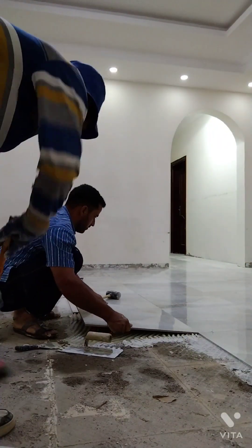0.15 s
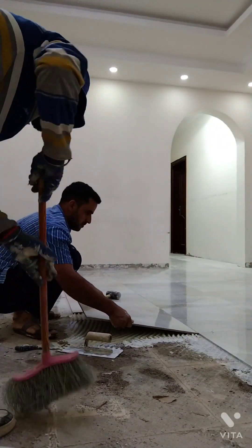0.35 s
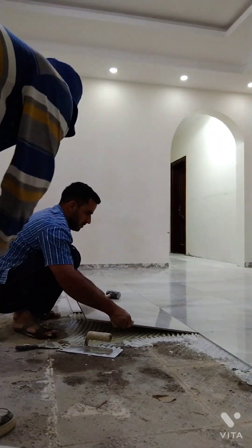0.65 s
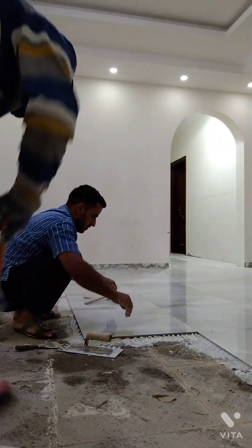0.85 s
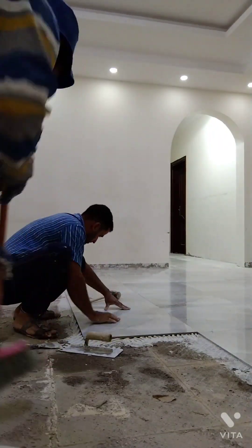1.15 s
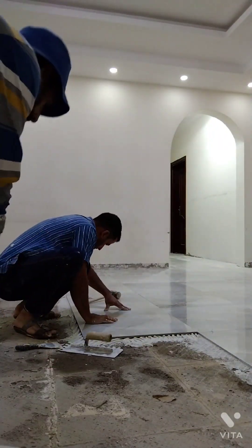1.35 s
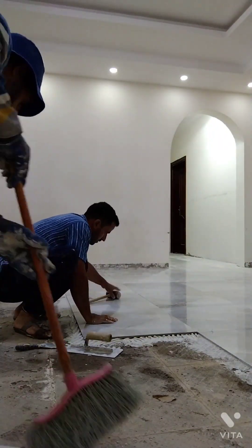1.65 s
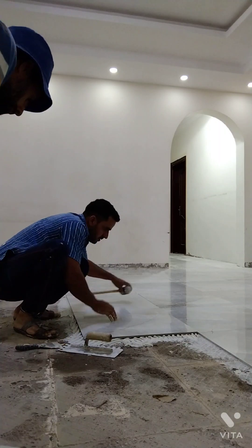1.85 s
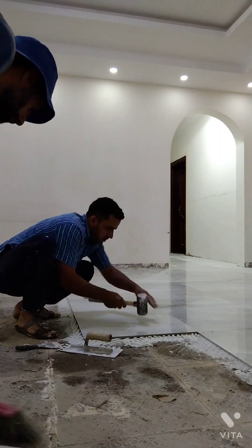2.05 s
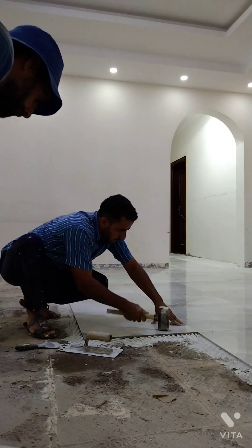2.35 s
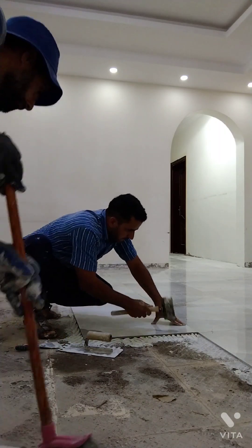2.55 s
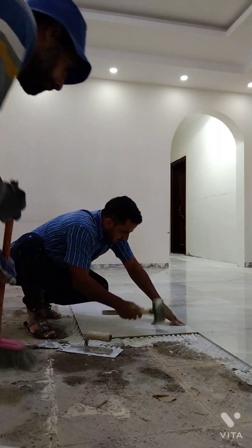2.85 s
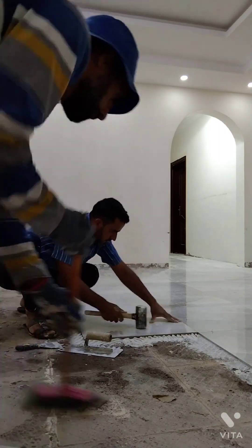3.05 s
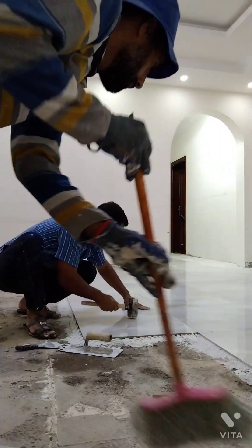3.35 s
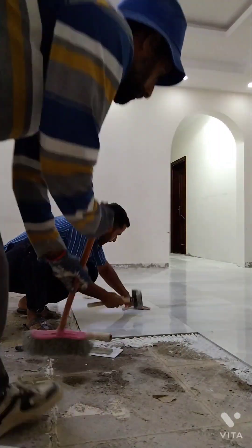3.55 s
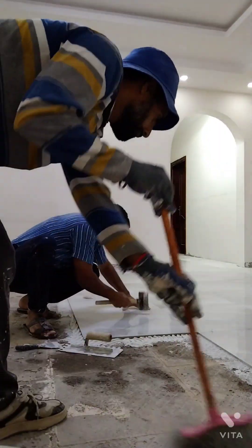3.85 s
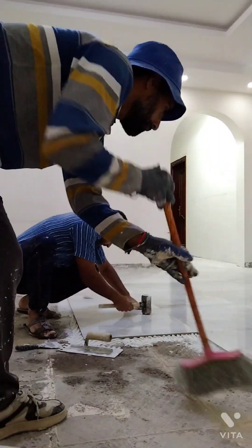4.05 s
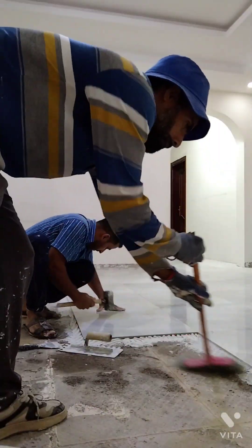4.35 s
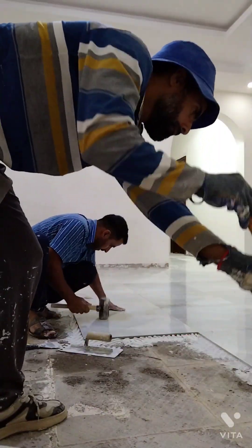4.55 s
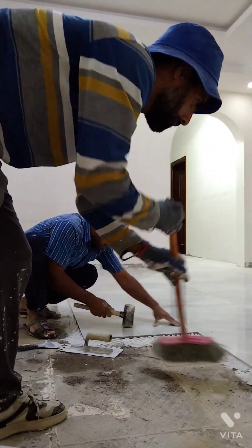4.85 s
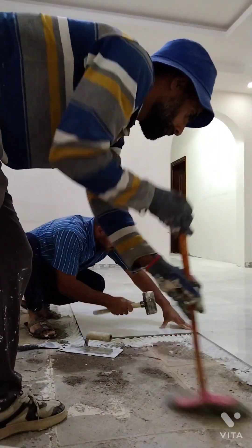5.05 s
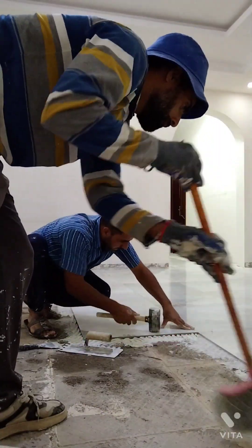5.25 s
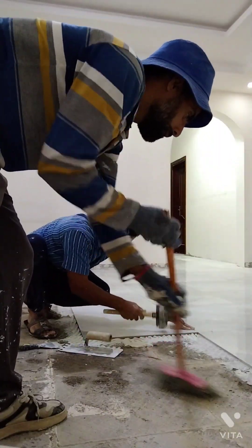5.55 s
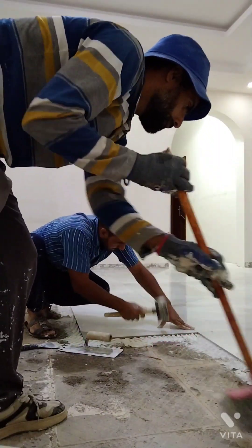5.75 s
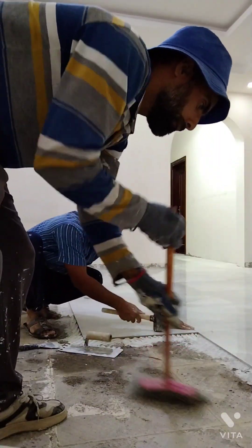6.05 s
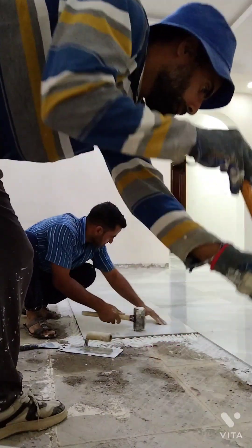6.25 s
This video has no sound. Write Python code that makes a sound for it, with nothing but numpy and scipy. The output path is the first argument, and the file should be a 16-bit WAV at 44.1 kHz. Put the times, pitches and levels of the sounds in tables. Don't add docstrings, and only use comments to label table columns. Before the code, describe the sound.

Inside a large empty hall with hard walls, a tile lands softly in adhesive and steel clangs in another room. Then brisk mallet knocks come in groups of five, five, two and a longer last run, each boomy and reverberant. Thin broom strokes brush grit close by, far quieter than the blows, with low slab rumble beneath and a small microphone's restrained noise floor.

```python
import sys
import numpy as np
from scipy import signal
from scipy.fft import rfft, irfft
from scipy.io import wavfile
from scipy.ndimage import uniform_filter1d

SR = 44100
rng = np.random.default_rng(int(sys.argv[2]) if len(sys.argv) > 2 else 0)


def put_to_file(sound):
    columns = np.atleast_2d(sound).T
    safe = np.clip(columns, -1, 1)
    whole_steps = np.round(safe * 32767)
    wavfile.write(sys.argv[1], SR, whole_steps.astype(np.int16))


def elevation(decibels):
    levels = np.asarray(decibels, float)
    return 10 ** (levels / 20)


N = 282460
EARLY = round(.3 * SR)

# [t/s, blow level/dB, direct level re blow/dB, crack level/dB]
MALLET_TAPS = [
    [(1.7795, -11.5, 9.5, 6.5), (1.9230, -13.5, 7, 7), (2.0510, -11.5, -21, 6), (2.1870, -12.5, 1, 5.5),
     (2.3165, -15.5, -5, -1.5)],
    [(2.9334, -13, 14, 3), (3.0792, -10.5, 10.5, 6.5), (3.2144, -10.5, 10.5, 8), (3.3548, -11.5, -19, 7),
     (3.5036, -12, 12.5, 8)],
    [(3.8650, -13.5, -23, 2), (3.9950, -16, -23, 6)],
    [(4.5330, -11, -18, 4.5), (4.6731, -12.5, -19, -1.5), (4.8188, -12, -4, -1), (4.9401, -12, 3, 3),
     (5.0794, -11.5, 12, 4), (5.2107, -15, -1, 5.5), (5.3411, -12.5, 7.5, -6), (5.3605, -23, -8, 9.5)],
]
# [delay/s, level/dB, crack level/dB]
WALL_ECHOES = [
    [(.0030, 0, -15), (.0095, -17, -14), (.0130, -3.5, 8), (.0250, -15, -18), (.0310, -14, 14)],
    [(.0097, 1, 4), (.0153, 0, -10), (.0290, -12, -10), (.0430, -23, 5), (.0950, 3, -28), (.1040, -19, -16)],
    [(.0053, -16, -12), (.0097, 3, 3), (.0190, -10, -11), (.0240, -3, -3), (.0440, 4, -8)],
    [(.0101, 6.5, 2.5), (.0158, 2.5, -12), (.0300, 4, -24), (.0350, -1, -3), (.0420, -5, 5)],
]
# [f/Hz, density level/dB per Hz]
TILE_SPOT_1 = [(82, -59), (140, -22.5), (524, -6.5), (578, -9.5), (638, -8), (874, -9), (1110, -9.5),
               (1640, -16), (1850, -21), (6780, -40.5), (8580, -46), (15500, -48.5)]
TILE_SPOT_2 = [(82, -41), (140, -33), (216, -17.5), (321, -0.5), (439, -5.5), (535, -3.5), (1010, -10),
               (1150, -7.5), (1850, -19.5), (3160, -30), (4160, -36), (6810, -44), (9160, -50.5),
               (15600, -36.5)]
TILE_SPOT_3 = [(82, -60), (140, -20), (181, -19), (284, -4), (382, -0.5), (578, -4.5), (1020, -13.5),
               (1640, -15), (1810, -22.5), (3020, -27), (8090, -48), (15500, -50)]
TILE_SPOT_4 = [(82, -50), (140, -9.5), (268, -8.5), (302, -3), (375, -2), (504, -3), (777, -2),
               (1350, -4.5), (1810, -14), (6650, -32.5), (10200, -40.5), (15500, -32)]
# [t/s, peak level/dB, f/Hz, T60/s, hall level/dB, slap level/dB]
SOFT_THUDS = [
    (.203, -8.5, 106, 0.025, -38, -26),
    (5.218, -7.5, 148, 0.034, -55, -49),
    (0.23, -38, 230, 0.026, -61, -25),
    (4.423, -24, 550, 0.047, -51, -40),
]
# [f/Hz, density level/dB per Hz]
ADHESIVE_SLAP = [(120, -61), (200, 2.5), (333, 0.5), (585, -6), (890, -12.5), (2020, -15.5), (6240, -30),
                 (9830, -36), (15500, -28)]
# [t/s, crash level/dB, length/s, swell/s]
STEEL_RATTLES = [
    (-.08, -43, 0.15, 0.03),
    (0.646, -60, 0.023, 0.005),
    (1.051, -40, 0.13, 0.0054),
    (2.736, -35, 0.063, 0.072),
    (2.813, -42, 0.028, 0.022),
]
# [f/Hz, density level/dB per Hz]
CRASH_SPECTRUM = [(300, -25.5), (1030, -9.5), (1880, -8.5), (3300, -12), (4500, -19), (6350, -26.5),
                  (8200, -39), (15500, -43.5)]
# [f/Hz, level/dB]
STEEL_MODES = [
    [(1430, -7), (2200, 0), (2340, -9), (3470, -10), (4410, 1), (5050, -16), (5730, -10), (6270, -14),
     (6890, -11), (8000, -24), (10100, -28)],
    [(4770, -10), (6490, -1), (9970, -2), (14000, -10), (14780, -11)],
    [(641, 0), (947, -3), (1310, -6)],
    [(1244, -5), (1427, -6), (1674, -10), (1846, 0), (2013, -7), (2202, -9), (2654, -6), (2778, -8),
     (3004, -3), (3100, -6), (3840, -14), (5889, -11), (9249, -19), (12760, -20)],
    [(9020, 0), (10600, -8)],
    [(1755, -6), (2180, -4), (3025, 0), (3505, -8), (4204, -16), (5000, -19), (5792, -13), (6220, -18),
     (6632, -11)],
    [(1222, 0), (1640, -8), (2665, -5), (9200, -34)],
    [(3555, -6), (4200, 0), (4980, -7), (6289, -8), (7900, -15), (10700, -19)],
]
# [t/s, ring level/dB, swell/s]
STEEL_STRIKES = [
    [(-.08, -34, .028)],
    [(.6, -47, .09), (1.05, -39, .004)],
    [(.647, -55, .0092)],
    [(1.05, -33, .004)],
    [(1.39, -54, .01)],
    [(2.76, -32, .04)],
    [(2.814, -30, .022)],
    [(1.05, -41, .004), (5.97, -51, .015)],
]
# [f/Hz, density level/dB per Hz]
FAR_KNOCK_TIMES = [.645, 6.357]
FAR_KNOCK_LEVELS = [-55, -34.5]
FAR_KNOCK_SPECTRUM = [(88, -56), (150, -27), (339, -8), (463, 9.5), (545, -4), (815, -18), (1380, -6.5),
                      (1710, -12), (1930, -41), (3000, -47), (3900, -81), (6600, -120)]
# [t at full speed/s, rise/s, fall/s, hiss level above 11 kHz/dB, dull share/dB]
BROOM_STROKES = [(0.0, .05, 0.036, -70, 17), (.214, 0.0092, 0.028, -46.5, 2.5),
                 (.38, 0.18, 0.064, -57.5, -1), (.61, 0.12, 0.078, -63, -19), (.97, 0.15, .1, -59, 1.5),
                 (1.1, .03, 0.063, -48, -6), (1.48, 0.18, 0.13, -59.5, 3), (1.95, 0.052, 0.044, -54, -2),
                 (2.35, .08, 0.049, -65, -8), (2.62, 0.2, .1, -60.5, 1), (2.83, 0.047, 0.06, -68, 3),
                 (3.28, 0.14, 0.055, -52, 5.5), (3.42, 0.03, 0.059, -58, 16), (3.87, .11, 0.098, -66, 1),
                 (4.03, 0.099, 0.093, -60, 5), (4.52, 0.11, .15, -59.5, 1.5), (5.0, 0.48, .3, -66, -11),
                 (5.36, 0.11, 0.051, -59.5, 15.5), (5.57, .1, 0.11, -64.5, 1),
                 (5.73, 0.044, 0.14, -60.5, 8.5), (6.13, 0.13, 0.13, -58.5, 3)]
# [f/Hz, density level/dB per Hz]
GRAIN_SPECTRUM = [(710, -65), (1200, -2.5), (1620, 0), (2300, -6), (6890, -9.5), (11300, -18.5),
                  (14700, -11), (15800, -20)]
# [t/s, level/dB]
SLAB_STAMPS = [(.1, -58), (.2, -31), (.7, -56.5), (1.14, -55), (2.6, -47), (2.77, -45), (3.5, -32),
               (4.059, -40), (4.36, -50), (5.09, -47)]
# [f/Hz, density level/dB per Hz]
AIR_SPECTRUM = [(24, -52), (40, 11), (825, -40), (935, -13), (1060, -28), (1430, 5), (2610, -19.5),
                (3030, 9), (3270, -0.5), (4640, -1), (15800, -28)]
# [f/Hz, T60/s, tail level/dB]
HALL_DECAY = [(60, 0.56, -7), (158, 0.93, 0), (380, 1.477, 4), (970, 1.397, 4), (2920, 0.96, 3),
              (4640, 0.74, -1), (8250, 0.32, 7.5), (14000, 0.12, -19)]
# [f/Hz, density level/dB per Hz, depth/dB]
SUPPRESSOR_GATE = [(90, -79, -7), (203, -81.5, -7), (352, -78.5, -16), (670, -84, -15), (1150, -85, -3),
                   (1700, -81, -16), (2500, -110, 0)]


def mallet():
    tail_db, blow_gain_db, direct_crack_db = 14.5, 14.0, -13.0
    crack_s = 0.0004
    crack_band = signal.butter(2, 3000, "high", fs=SR, output="sos")
    fade = np.exp(-np.arange(200) / (crack_s * SR))
    fade_norm = np.sqrt(np.sum(fade ** 2))
    spots = (TILE_SPOT_1, TILE_SPOT_2, TILE_SPOT_3, TILE_SPOT_4)
    out = 0
    for taps, walls, spot in zip(MALLET_TAPS, WALL_ECHOES, spots):
        tail = elevation(tail_db) * hall_tail(rise_s=0.0064, dense_s=.12)
        knock = pulse(spot)
        crack = signal.sosfilt(crack_band, knock)
        s, blow_db, direct_db, crack_db = np.transpose(taps)
        blow_db = blow_db + blow_gain_db
        grit_db = blow_db + crack_db

        body = through(clicks(s, elevation(blow_db)), tail)
        body -= clicks(s, elevation(blow_db + direct_db))
        grit = through(clicks(s, elevation(grit_db)), tail)
        arrivals = [(s, grit_db + direct_db + direct_crack_db)]
        for delay, wall_db, shine_db in walls:
            body += clicks(s + delay, elevation(blow_db + wall_db))
            arrivals.append((s + delay, grit_db + wall_db + shine_db))

        for at, db in np.concatenate(arrivals, axis=1).T:
            i = round(at * SR) + EARLY
            smear = rng.standard_normal(len(fade)) * fade / fade_norm
            grit[i:i + len(fade)] += elevation(db) * smear
        out = out + through(body, knock - crack) + through(grit, crack)
    return out


def thuds(tail):
    slap_t60_s = 0.52
    t = np.arange(SR // 4) / SR
    out = 0
    for s, peak_db, hz, t60, hall_db, slap_db in SOFT_THUDS:
        cycles = np.sin(2 * np.pi * hz * t) * elevation(-60 * t / t60)
        push = through(clicks([s], 0.87), cycles)
        burst = rng.standard_normal(len(t)) * elevation(slap_db - 60 * t / slap_t60_s)
        slap = through(through(clicks([s], 0.55), burst), pulse(ADHESIVE_SLAP))
        sent = elevation(hall_db + 14.5) * push + elevation(-14.0) * slap
        out = out + elevation(peak_db) * push + slap + through(sent, tail)
    return out


def steel_piece(modes):
    split_hz = 17.0
    t60_s, damp_hz = 1.0, 7000
    t = np.arange(SR) / SR
    draws = rng.standard_normal((len(modes), 2, 4, 1))
    sound = 0
    for (hz, level_db), (offset, phase) in zip(modes, draws):
        partial_hz = hz + split_hz * np.sqrt(hz / 1000) * (offset - offset[0])
        cluster = np.sin(2 * np.pi * (partial_hz * t + phase)).T @ [1, .55, .4, .3]
        t60 = t60_s / (1 + (hz / damp_hz) ** 1.6)
        sound = sound + elevation(level_db - 60 * t / t60) * cluster
    return sound


def clangs(tail):
    hall_ring_db = -17
    t = np.arange(SR) / SR
    crash, ring = 0, 0
    for s, crash_db, length, swell in STEEL_RATTLES:
        envelope = (1 - np.exp(-t / swell)) * np.exp(-t / length)
        rattle = rng.standard_normal(len(t)) * envelope / np.sqrt(length * SR)
        crash = crash + through(clicks([s], elevation(crash_db + 47)), rattle)
    crash = through(crash, pulse(CRASH_SPECTRUM))

    for modes, strikes in zip(STEEL_MODES, STEEL_STRIKES):
        sound = steel_piece(modes)
        for s, ring_db, swell in strikes:
            ring = ring + through(clicks([s], elevation(ring_db)), sound * (1 - np.exp(-t / swell)))

    knock_clicks = clicks(FAR_KNOCK_TIMES, elevation(np.array(FAR_KNOCK_LEVELS) + 33.5))
    knock = through(knock_clicks, pulse(FAR_KNOCK_SPECTRUM))
    direct = elevation(1.0) * crash + ring + elevation(-15.5) * knock
    return direct + through(crash + knock + elevation(hall_ring_db) * ring, tail)


def broom(tail):
    grains_per_s, uneven_db = 9000, 3.5
    edge_db, rest_db = -10, -90.5
    t = (np.arange(N + EARLY) - EARLY) / SR
    sizes = elevation(uneven_db * np.minimum(rng.exponential(1, len(t)), 5))
    sizes = sizes * rng.choice([-1, 1], len(t))
    flicked = rng.random(len(t)) < grains_per_s / SR
    grit = through(sizes * flicked, pulse(GRAIN_SPECTRUM))
    bright = signal.sosfilt(signal.butter(4, 11000, "high", fs=SR, output="sos"), grit)
    dull = signal.sosfilt(signal.butter(2, 7000, "low", fs=SR, output="sos"), grit)
    stroke = elevation(rest_db) * grit
    for s, rise, fall, hiss_db, dull_db in BROOM_STROKES:
        off_peak = (t - s) / np.where(t < s, rise, fall)
        speed = elevation(hiss_db + edge_db * off_peak ** 2)
        stroke = stroke + speed * (grit + (elevation(dull_db) - 1) * dull)
    stroke = stroke / np.std(bright)
    return stroke + elevation(-5.5) * through(stroke, tail)


def rumble():
    t60_s, rise_s, per_tap_db = 1.48, 0.01, -28.5
    taps = [(row[0], row[1] + per_tap_db) for spot in MALLET_TAPS for row in spot]
    s, level_db = np.transpose(taps + list(SLAB_STAMPS))
    t = np.arange(2 * SR) / SR
    decay = elevation(-120 * t / t60_s) * (1 - np.exp(-t / rise_s))
    energy = through(clicks(s, elevation(2 * level_db)), decay)
    band = signal.butter(3, [60, 135], "band", fs=SR, output="sos")
    low = signal.sosfilt(band, rng.standard_normal(N + EARLY))
    low = low / np.sqrt(np.mean(low ** 2) + 1e-20)
    return low * np.sqrt(np.maximum(energy, 0))


def still_air():
    return elevation(-59) * through(rng.standard_normal(N + EARLY), pulse(AIR_SPECTRUM))


def hall_tail(rise_s, dense_s):
    t = np.arange(2 * SR) / SR
    edges = 30 * 2 ** np.arange(0, 9.6, .5)
    crowd = np.clip((t / dense_s) ** 2, .04, 1)
    present = rng.random(len(t)) < crowd
    white = rng.standard_normal((2, len(t))) * present / np.sqrt(crowd)
    tail = 0
    for k, (low, high) in enumerate(zip(edges, np.minimum(edges[1:], .45 * SR))):
        band_pass = signal.butter(2, [low, high], "band", fs=SR, output="sos")
        band = signal.sosfilt(band_pass, white[k % 2])
        hz = np.sqrt(low * high)
        level_db = at_hz(HALL_DECAY, hz, count=2)
        tail = tail + band * elevation(level_db - 60 * t / at_hz(HALL_DECAY, hz))
    return tail * (1 - np.exp(-(t / rise_s) ** 2)) / np.sqrt(SR / 20)


def at_hz(points, hz, count=1):
    table = np.array(points)
    return np.interp(np.log(hz + 1), np.log(table[:, 0]), table[:, count])


def pulse(spectrum, size=2048):
    fold = irfft(np.log(elevation(at_hz(spectrum, np.linspace(0, SR / 2, size + 1)))))
    fold[1:size] *= 2
    fold[size + 1:] = 0
    shape = irfft(np.exp(rfft(fold)))[:size]
    return shape / np.sqrt(np.sum(shape ** 2))


def through(x, response):
    return signal.fftconvolve(x, response)[:len(x)]


def clicks(times, sizes):
    line = np.zeros(N + EARLY)
    np.add.at(line, np.round(np.array(times) * SR).astype(int) + EARLY, sizes)
    return line


def scene():
    far = hall_tail(rise_s=0.0035, dense_s=.06)
    mix = mallet() + thuds(far) + clangs(far) + broom(far) + rumble() + still_air()
    return mix[None, EARLY:]


def suppress(x):
    knee_db, size, overlap = 1.0, 1024, 896
    hz, _, frames = signal.stft(x, SR, nperseg=size, noverlap=overlap)
    density = np.abs(frames) ** 2 * size / (.75 * SR)
    power = uniform_filter1d(density, size=7, axis=0)
    recent = uniform_filter1d(power, size=15, axis=1, origin=3)
    over_db = 10 * np.log10(np.maximum(recent, 1e-20)) - at_hz(SUPPRESSOR_GATE, hz)[:, None]
    shut = .5 - .5 * np.tanh(over_db / knee_db)
    depth_db = at_hz(SUPPRESSOR_GATE, hz, count=2)[:, None]
    return signal.istft(frames * elevation(depth_db * shut), SR, nperseg=size, noverlap=overlap)[1][:len(x)]


def gain_control(x):
    knee_db, squeeze, release_db_per_s = -15.5, 0.24, 70.0
    level = 10 * np.log10(uniform_filter1d(x ** 2, size=441) + 1e-12)
    fall = release_db_per_s * np.arange(len(x)) / SR
    held = np.maximum.accumulate(level + fall) - fall
    cut_db = squeeze * np.maximum(held - knee_db, 0)
    return x * elevation(-uniform_filter1d(cut_db, size=221))


def low_pass(x):
    return signal.sosfilt(signal.butter(12, 16510, fs=SR, output="sos"), x)


def record(dry):
    x = signal.sosfilt(signal.butter(4, 64, "high", fs=SR, output="sos"), dry[0])
    x = x + elevation(-13.0) * signal.lfilter(*signal.iirpeak(15000, 4.0, fs=SR), x)
    x = gain_control(suppress(x))
    x = 0.8 * np.tanh(x / 0.87)
    x = signal.sosfilt(signal.cheby2(14, 60, 16300, fs=SR, output="sos"), x)
    return low_pass(x[None])


dry = scene()
out = record(dry)
put_to_file(out)
```